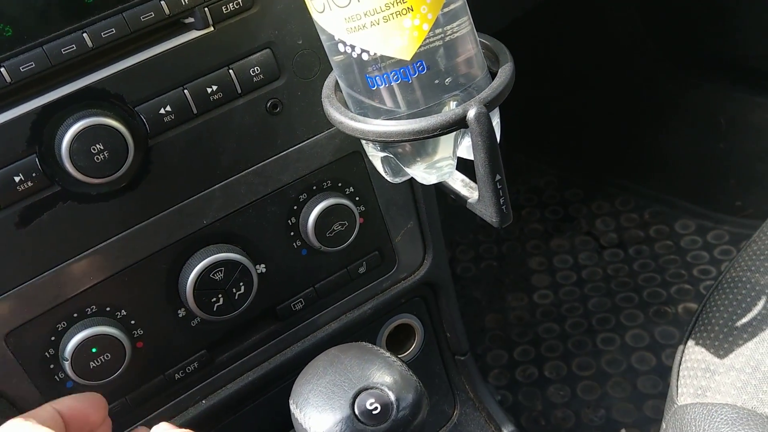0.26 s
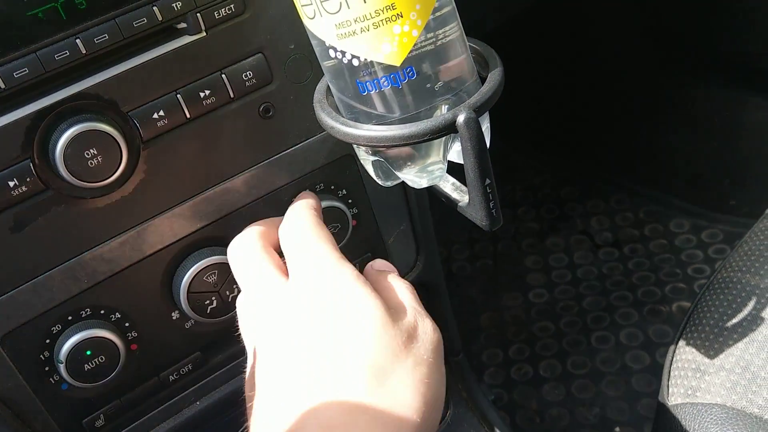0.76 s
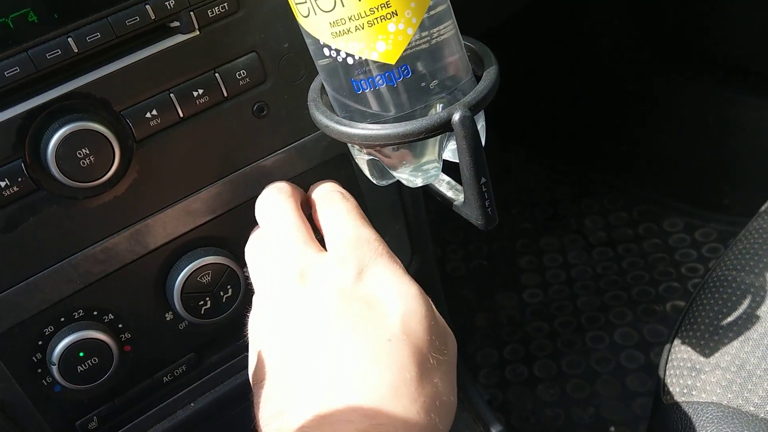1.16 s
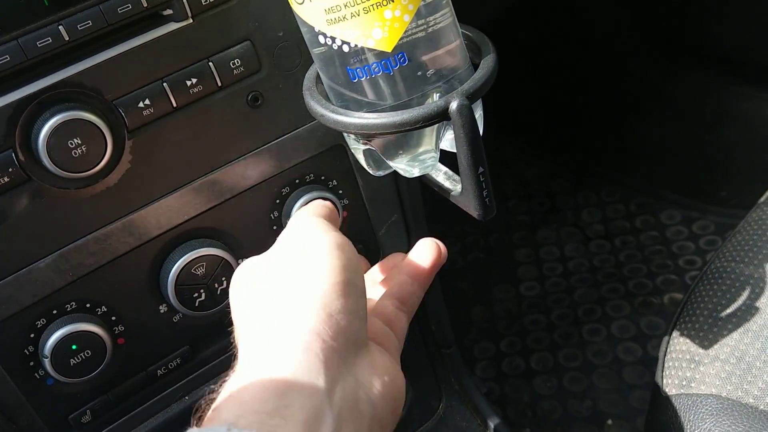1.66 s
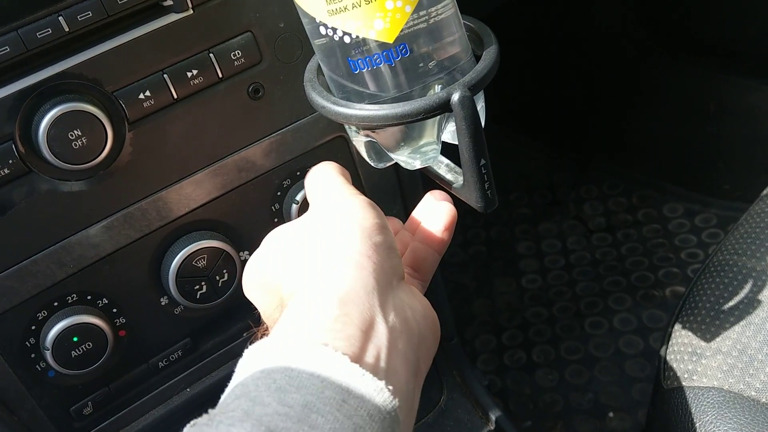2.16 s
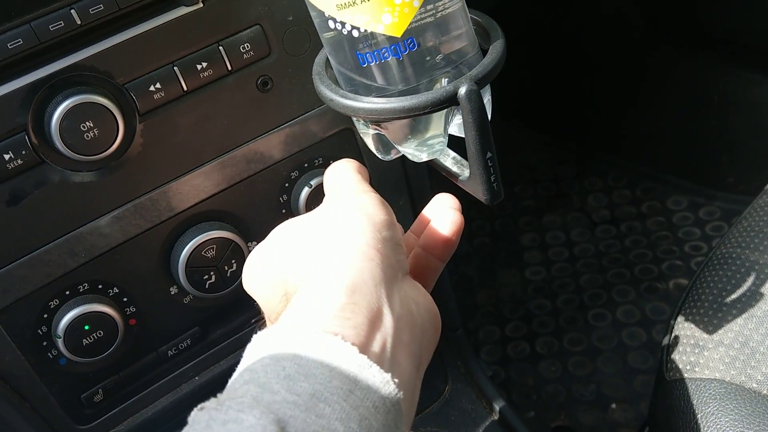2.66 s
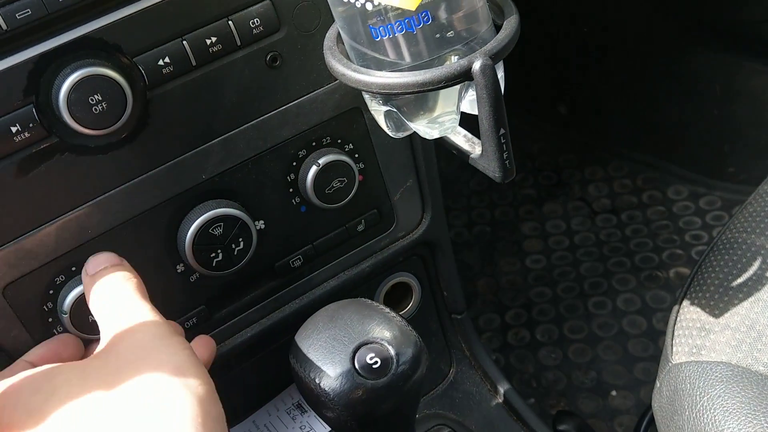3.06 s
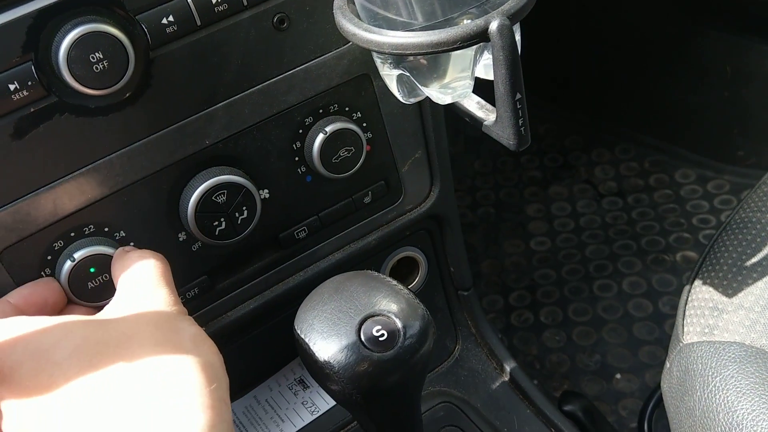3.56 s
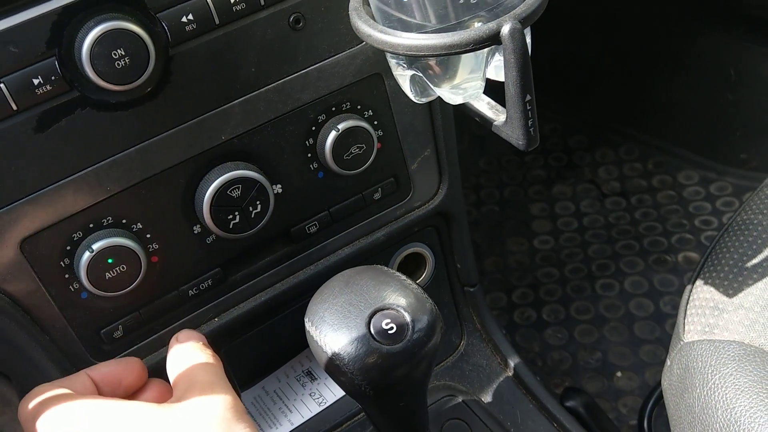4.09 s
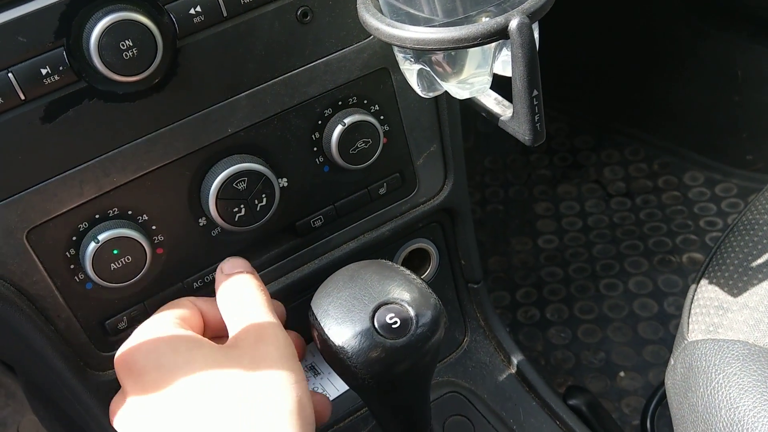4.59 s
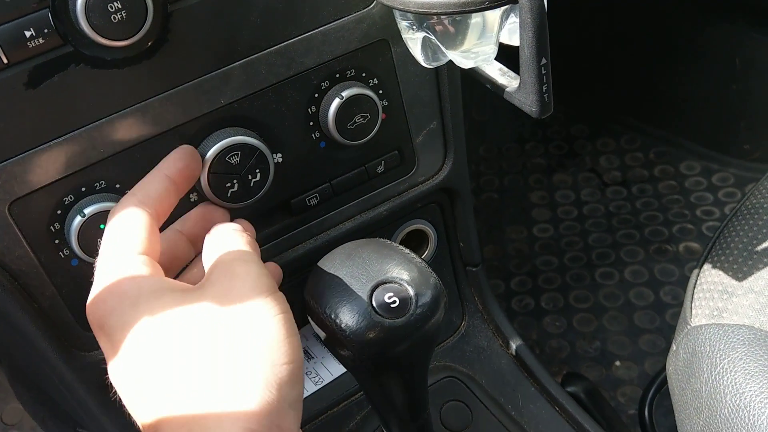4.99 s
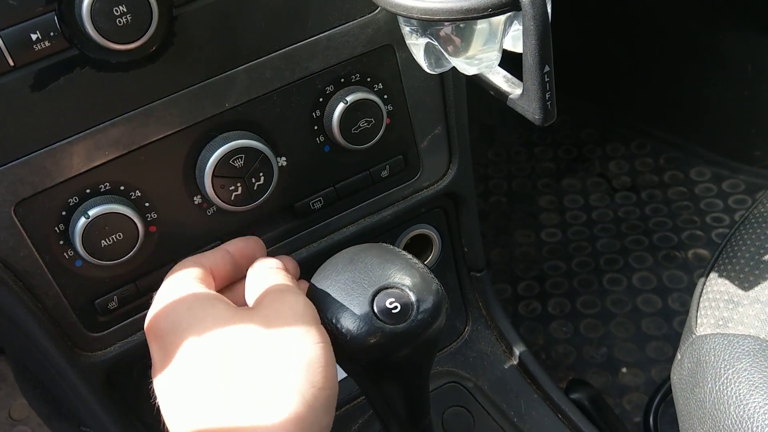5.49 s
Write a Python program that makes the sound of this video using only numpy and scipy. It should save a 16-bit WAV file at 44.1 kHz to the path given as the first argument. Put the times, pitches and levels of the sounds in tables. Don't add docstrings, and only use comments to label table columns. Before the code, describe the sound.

Heard close up in stereo inside a small, dry car cabin. From 0 to about 2.4 s a dashboard blower runs at full strength: a broad, steady, breathy rush with hollow duct resonances and a low fan hum. Beneath it an engine idles as a deep, smooth boom near 38 Hz, with slight body shudder. Crisp double plastic ticks from a dial come at 0.12 and 1.32 s, leaning left. Soft low draught thumps hit mostly the left side, strongest around 1.1 and 1.6 s, with another near 2.8 s. The rush eases, drops fast around 3 s and keeps dulling to a weak flow by the end, while the idle sinks slightly in pitch and level. Faint ticks occur at 2.96 s, in a cluster from 3.44 to 3.66 s, and barely at 4.62 s. At 5.35-5.5 s a dry, crackling seat creak with a brief rubbing scrape stands out, left of centre.

```python
import sys
import numpy as np
from scipy import signal
from scipy.fft import rfft, irfft, next_fast_len
from scipy.io import wavfile
from scipy.ndimage import uniform_filter1d

SR = 44100
rng = np.random.default_rng(int(sys.argv[2]) if len(sys.argv) > 2 else 0)


def output_pcm(signal):
    pcm = np.clip(np.atleast_2d(signal).T, -1, 1) * 32767
    wavfile.write(sys.argv[1], SR, np.round(pcm).astype(np.int16))


def amplitude_ratio(level_db):
    exponent = np.asarray(level_db, float) / 20
    return 10 ** exponent


N = 252847
TIME_S = np.arange(N) / SR

# t/s, level/dB
AIR_RUSH = [
    (0.0, -32.5),
    (1.7, -32.5),
    (2.42, -33.5),
    (2.65, -34.5),
    (3.14, -40),
    (4.2, -45.5),
    (4.96, -48),
    (5.73, -50.5),
]
FULL_RUSH_DB, SLOW_RUSH_DB = -35.5, -54.5
# f/Hz, level/dB
PORT_BALANCE = [(60, -25), (150, 2.5), (500, 2.5), (750, 0.5), (1100, 1.5), (1400, -1), (1900, -2),
                (2600, -2.5), (4300, -2), (5300, 4.5), (6000, -2), (8900, 10.5), (10300, 9), (14000, -2)]


def evened(x):
    return x / np.sqrt(np.mean(x ** 2) + 1e-20)


def read(points, hz):
    f, *columns = np.transpose(points)
    return np.squeeze([np.interp(np.log(hz + 1), np.log(f + 1), c) for c in columns])


def follow(rows, t_s):
    s, *columns = np.transpose(rows)
    return np.squeeze([np.interp(t_s, s, c) for c in columns])


def coloured(x, points):
    n = x.shape[-1]
    size = next_fast_len(n)
    gain = amplitude_ratio(read(points, np.fft.rfftfreq(size, 1 / SR)))
    return irfft(rfft(x, size) * gain, size)[..., :n]


def coloured_noise(points):
    return evened(coloured(rng.standard_normal(N), points))


def drift(per_s, channels):
    lowpass = signal.butter(2, per_s, fs=SR, output="sos")
    slow = signal.sosfilt(lowpass, rng.standard_normal((channels, N + SR)))
    return evened(slow[:, SR:])


def left_right(db):
    return amplitude_ratio(np.array([[db], [-db]]))


def ported(x):
    sides = []
    for channel, share in zip(x, (.5, -.5)):
        sides.append(coloured(channel, [(f, share * db) for f, db in PORT_BALANCE]))
    return np.array(sides)


def add(mix, s, sound):
    part = mix[:, round(s * SR):][:, :sound.shape[1]]
    part += sound[:, :part.shape[1]]


def snap(rise_s, t60_s):
    t_s = np.arange(3000) / SR
    one, other = rng.standard_normal((2, len(t_s)))
    shape = (1 - np.exp(-t_s / rise_s)) * amplitude_ratio(-60 * t_s / t60_s)
    puffs = np.array([one, .25 * one + other]) * shape
    return puffs * np.linalg.norm(shape) / np.linalg.norm(puffs, axis=1, keepdims=True)


def blower():
    # f/Hz, density/dB per Hz
    full_colour = [(60, -44), (90, -24.5), (125, -0.5), (170, -5.5), (370, -9), (713, -9), (1160, -14),
                   (2430, -22), (3260, -26.5), (5500, -34.5), (9300, -44), (9800, -55.5), (12000, -54),
                   (14000, -79)]
    # f/Hz, density/dB per Hz
    slow_colour = [(60, -50), (90, -5), (125, -8), (170, -10.5), (370, -16.5), (713, -13.5), (1160, -19.5),
                   (2430, -32), (3260, -39.5), (5500, -47), (9300, -59), (9800, -76), (12000, -67),
                   (14000, -73)]
    # f/Hz, width/Hz, level/dB
    duct_modes = [(119, 12, 9.5), (168, 19, -3.5), (213, 49, 6), (373, 52, 4), (485, 44, -6.5),
                  (722, 250, 2.5), (884, 41, -5), (1149, 35, 5), (1360, 130, 3), (1530, 150, 3),
                  (2090, 99, 2), (2185, 54, -6), (2424, 125, 4.5), (2649, 112, 7), (3320, 80, -6.5),
                  (3600, 86, 3.5), (4170, 180, 2), (8100, 650, -1)]
    # f/Hz, likeness/0-1, left lead/rad
    port_pair = [(60, 0.97, 0.26), (259, 0.96, 0.21), (525, 0.93, 0.51), (755, 0.92, -0.41),
                 (980, 0.48, 0.48), (1210, 1, 0.73), (1480, 0.01, 0.6), (2085, 0.58, -0.45),
                 (2200, 1, 0.13), (2620, 0.68, -1.2), (2640, 0.56, -0.069), (3550, 0.3, -1.6),
                 (4800, 0, 0.27), (14000, 0.22, 0.52)]
    frame = 2048
    hop = frame // 4
    t_s, hz = np.arange(N // hop + 5) * hop / SR, np.fft.rfftfreq(frame, 1 / SR)
    rush_db = follow(AIR_RUSH, t_s)
    speed = np.clip((rush_db - SLOW_RUSH_DB) / (FULL_RUSH_DB - SLOW_RUSH_DB), -.3, 1.2)

    ducts_db = sum(db / (1 + (2 * (hz - f) / width) ** 2) for f, width, db in duct_modes)
    band = (hz > 300) & (hz < 3000)

    def levelled(colour):
        colour_db = read(colour, hz) + ducts_db
        return colour_db - 10 * np.log10(np.sum(amplitude_ratio(2 * colour_db[band])))

    full_db, slow_db = levelled(full_colour)[:, None], levelled(slow_colour)[:, None]
    left_re, left_im, own_re, own_im, patches = rng.standard_normal((len(t_s), len(hz), 5)).T
    patches = uniform_filter1d(patches, size=20, axis=0)
    patches = evened(uniform_filter1d(patches, size=6, axis=1))
    patches_db = (0.77 + 0.29 * hz[:, None] / 10000) * patches
    field_db = full_db * speed + slow_db * (1 - speed) + rush_db + patches_db

    same, lead_rad = read(port_pair, hz)[:, :, None]
    same = np.clip(same, 0, 1)
    left = left_re + 1j * left_im
    right = same * left + np.sqrt(1 - same ** 2) * (own_re + 1j * own_im)
    spectra = np.array([left, right * np.exp(-1j * lead_rad)])

    ripple_db = 1.17 * evened(uniform_filter1d(rng.standard_normal((2, len(hz), 1)), size=3, axis=1))
    ripple_db = ripple_db * np.minimum(hz / 1500, 1)[:, None]
    balance_db = np.array([.5, -.5])[:, None, None] * read(PORT_BALANCE, hz)[:, None]
    spectra *= amplitude_ratio(field_db + ripple_db + balance_db)
    return amplitude_ratio(1.5) * signal.istft(spectra, nperseg=frame, noverlap=frame - hop)[1][:, :N]


def engine():
    # t/s, firing f/Hz
    idle = [
        (0.0, 38.61),
        (1.3, 38.29),
        (2.4, 37.53),
        (3.2, 37.09),
        (4.2, 36.64),
        (4.7, 35.6),
        (5.73, 34.54),
    ]
    # multiple, level/dB, phase/rad
    orders = [
        (.5, -24.5, 2.5),
        (1, 1.5, 0.5),
        (2, -19.5, -0.86),
        (3, -15, 4),
        (6, -31.5, 0),
    ]
    hunt_hz, hunt_db = .25, 0.5
    boom_hz, boom_db, boom_db_per_hz = 38.13, -29.5, 1.35
    hunt = drift(3.84, channels=2)
    hz = follow(idle, TIME_S)
    level_db = boom_db + boom_db_per_hz * (hz - boom_hz) + hunt_db * hunt[1]
    phase_rad = 2 * np.pi * np.cumsum(hz + hunt_hz * hunt[0]) / SR + 1.475
    uneven = drift(8.6, channels=len(orders))
    boom = np.zeros(N)
    for (multiple, db, lag_rad), wobble in zip(orders, uneven):
        order_db = db + 0.067 * (multiple - 0.5) * wobble
        boom += amplitude_ratio(order_db) * np.cos(multiple * phase_rad + lag_rad)
    return np.sqrt(2) * amplitude_ratio(level_db) * boom * left_right(.35)


def draught():
    # peak t/s, level/dB, length/s
    gust_table = [(1.071, -25.5, 0.032), (1.195, -35, 0.055), (1.52, -36, .04), (1.566, -25.5, 0.04),
                  (1.64, -31, 0.039), (1.69, -33, 0.076), (1.76, -37, .04), (2.183, -34.5, .04),
                  (2.57, -33, .04), (2.839, -30.5, 0.043), (3.093, -44, 0.055), (3.898, -46, 0.037),
                  (4.18, -45, 0.034), (4.27, -40, .08), (4.37, -41, 0.097), (4.458, -43, 0.036),
                  (4.67, -42, 0.083), (5.02, -48, .08), (5.207, -49, 0.072), (5.324, -42, 0.032),
                  (5.502, -52, .05), (5.583, -37, 0.055), (5.714, -50, .06)]
    calm_db, calm_slope = -54, 0.24
    gust = amplitude_ratio(calm_db + calm_slope * (follow(AIR_RUSH, TIME_S) - FULL_RUSH_DB))
    for s, db, length_s in gust_table:
        gust = gust + amplitude_ratio(db) * np.exp(-(2 * (TIME_S - s) / length_s) ** 2)
    gust_db = 20 * np.log10(gust)
    near, far = rng.standard_normal((2, N)) * amplitude_ratio(2 * drift(52, channels=2))
    eddies = np.array([near, 0.14 * near + 0.23 * far])
    large_colour = [(12, -1.0), (70, 4.5), (130, -2.5), (300, -39), (600, -68), (1200, -120)]
    fine_colour = [(60, -16), (130, 2.5), (220, 3.0), (350, -3), (600, -6.5), (1200, -36), (2400, -120)]
    large = evened(coloured(eddies, large_colour))
    fine = evened(coloured(eddies, fine_colour))
    fine_db = np.minimum(0.64 * (gust_db + 32.5), 1.5)
    return amplitude_ratio(gust_db - 3.0) * (large + fine * amplitude_ratio(fine_db))


def knobs():
    # t/s, level/dB, ring f/Hz, ring share/dB, left-right/dB
    detents = [(0.1153, -35.5, 7530, 0, 9), (0.1344, -42, 7600, 3, 7), (1.3196, -35.5, 7880, -7, 5),
               (1.345, -38, 7940, -5, 6), (2.9603, -52, 6220, 0.0, -1.5), (3.4364, -65, 8010, 0.0, 0.0),
               (3.4552, -58, 6080, 0.0, 0.0), (3.492, -48, 8700, -8, 6), (3.5528, -54, 5965, -2, -0.5),
               (3.631, -46, 7800, -15, 1), (3.6638, -51, 8800, -2, 1), (4.62, -56, 6040, -5, -0.5)]
    out = np.zeros((2, N))
    for s, db, hz, ring_db, pan_db in detents:
        tick = amplitude_ratio(1.0) * snap(0.00044, 0.016) + amplitude_ratio(-14) * snap(0.0018, 0.12)
        knock = [(1200, -30), (3300, 0.), (5000, -6)]
        ring = [(hz - 900, -9), (hz, ring_db), (hz + 1100, -14), (10500, -19), (14500, -33)]
        add(out, s, amplitude_ratio(db + 11.0) * coloured(tick, knock + ring) * left_right(.5 * pan_db))
    return out


def seat():
    # t/s, level/dB, left-right/dB
    slips = [(5.3448, -44.5, 7), (5.3513, -54, 1.0), (5.3983, -43.5, 4), (5.4114, -48, 3.5),
             (5.426, -36.5, 7), (5.4347, -38, 4), (5.443, -30.5, 12), (5.45, -33, -8), (5.455, -30, 6),
             (5.4608, -27.5, 8), (5.4645, -28, 7), (5.4718, -32, -4), (5.4728, -35, -3), (5.482, -37, 3.5),
             (5.487, -43, 3.5), (5.4947, -33, 2.5), (5.501, -48, 2.5), (5.5103, -43, 2), (5.5174, -60, 2),
             (5.5438, -57, 0.0)]
    # f/Hz, density/dB per Hz
    cover_colour = [(1500, -4.5), (3000, -7.5), (4700, -3.5), (5600, -9.5), (6300, -5.5), (7100, -13),
                    (8200, -5.5), (9000, -10), (10000, -19), (11200, -11), (12400, -16), (13500, -28),
                    (14500, -38), (16000, -50)]
    # f/Hz, density/dB per Hz
    cushion_colour = [(150, -25), (400, -3), (1100, 13), (1500, 3.5), (2150, 8), (3000, -10), (4000, -2),
                      (6000, -20), (9000, -32), (16000, -70)]
    stroke_s, stroke_db = 5.46, -40.5
    stroke_width_s, stroke_fall_db = .1, 21.5
    creak = np.zeros((2, N))
    for s, db, pan_db in slips:
        slip = amplitude_ratio(0.0) * snap(.00005, 0.0025) + amplitude_ratio(-0.3) * snap(0.0002, 0.017)
        slip = slip + amplitude_ratio(-7.5) * snap(.001, 0.051)
        add(creak, s, amplitude_ratio(db + 8.0) * slip * left_right(.25 * (pan_db - 2.5)))
    grains = rng.standard_normal((2, N)) * amplitude_ratio(3.8 * drift(300, channels=1))
    drag_db = stroke_db - stroke_fall_db * ((TIME_S - stroke_s) / stroke_width_s) ** 2
    drag = evened(coloured(grains, cushion_colour)) * amplitude_ratio(drag_db)
    return ported(coloured(creak, cover_colour) + drag)


def rumble():
    # f/Hz, density/dB per Hz
    shudder_colour = [(35, -27), (52, -2), (75, 0), (110, -4), (200, -31.5), (400, -120)]
    # f/Hz, density/dB per Hz
    mount_colour = [(6, -20), (16, -14), (24, -1.5), (29, -0.5), (36, -1), (50, -13), (80, -13), (200, -62),
                    (400, -120)]
    # t/s, f/Hz, level/dB
    fan_wheel = [
        (0, 55, -43),
        (2.3, 55, -51.5),
        (3.0, 47.75, -50),
        (3.6, 39, -75),
        (5.73, 41, -78),
    ]
    shudder_full_db, shudder_slope, swing_db = -44, 1, 2
    shudder_db = shudder_full_db + shudder_slope * (follow(AIR_RUSH, TIME_S) - FULL_RUSH_DB)
    shudder_db = shudder_db + swing_db * drift(1.83, channels=1)[0]
    shudder = coloured_noise(shudder_colour) * amplitude_ratio(shudder_db)
    shake = coloured_noise(mount_colour) * amplitude_ratio(-38.5)
    hz, wheel_db = follow(fan_wheel, TIME_S)
    wheel_db = wheel_db + 2.0 * drift(0.49, channels=1)[0]
    wheel = np.sqrt(2) * amplitude_ratio(wheel_db) * np.sin(2 * np.pi * np.cumsum(hz) / SR)
    return (shudder + shake + wheel) * left_right(.4)


def scene():
    return blower() + engine() + draught() + knobs() + seat() + rumble()


def top_cut(x):
    return signal.sosfilt(signal.butter(12, 14230, fs=SR, output="sos"), x)


def record(dry):
    hiss = amplitude_ratio(-71.5) * rng.standard_normal(dry.shape)
    heard = dry + hiss - .0006
    return top_cut(heard)


dry = scene()
out = record(dry)
output_pcm(out)
```